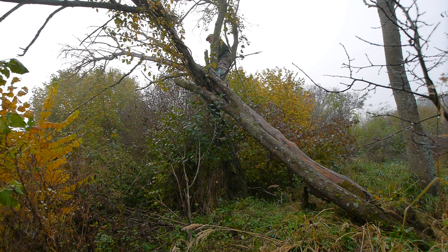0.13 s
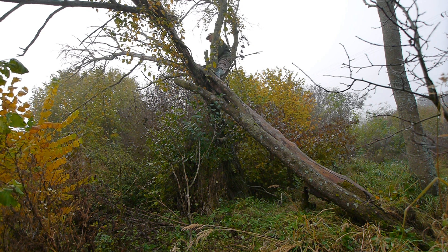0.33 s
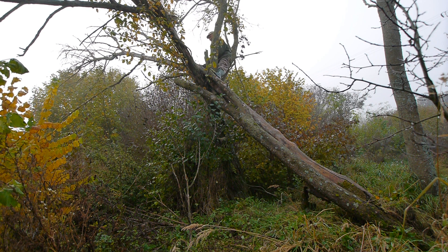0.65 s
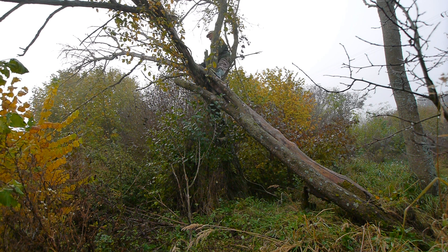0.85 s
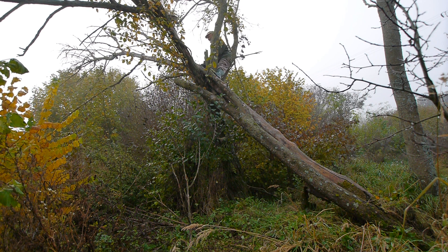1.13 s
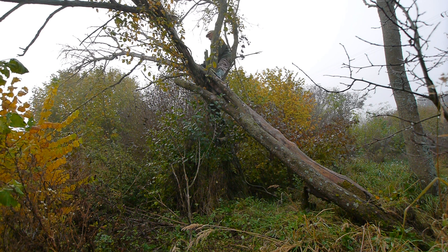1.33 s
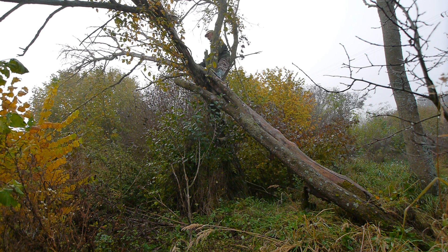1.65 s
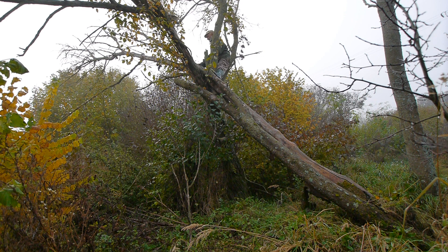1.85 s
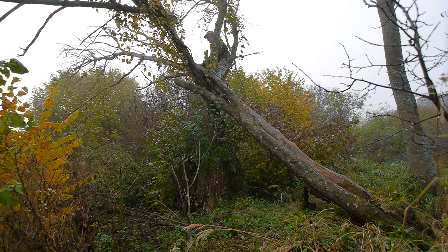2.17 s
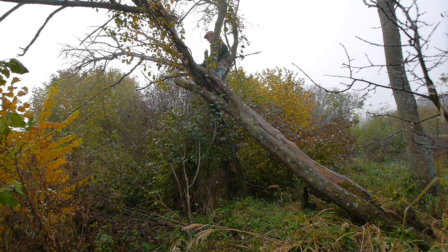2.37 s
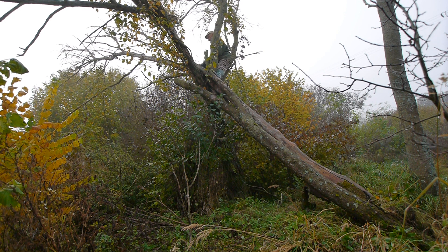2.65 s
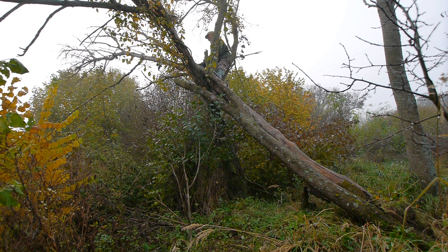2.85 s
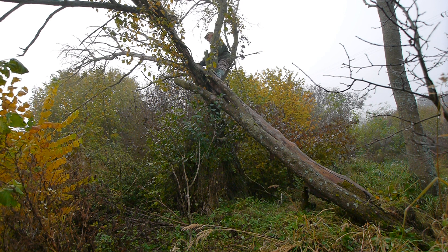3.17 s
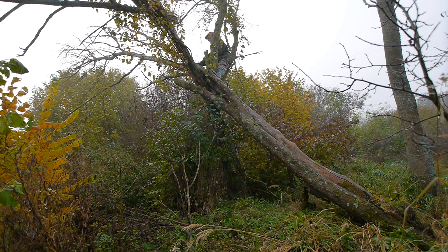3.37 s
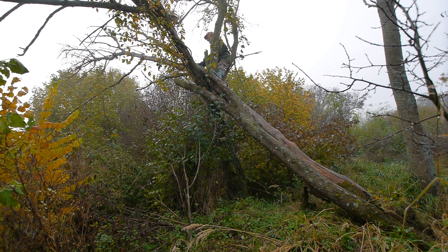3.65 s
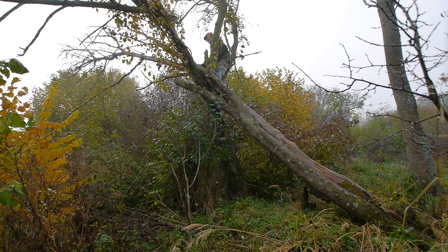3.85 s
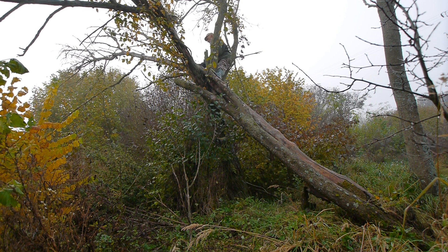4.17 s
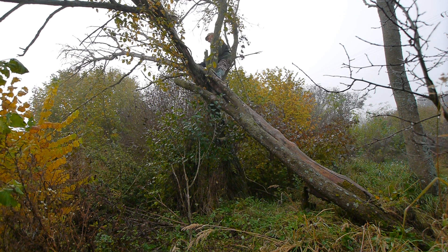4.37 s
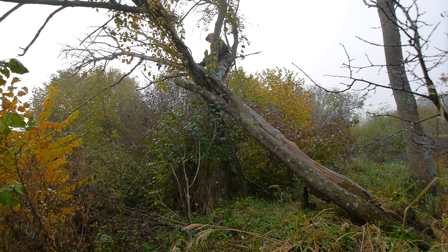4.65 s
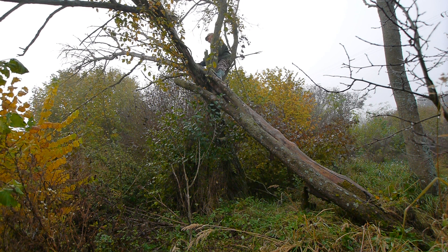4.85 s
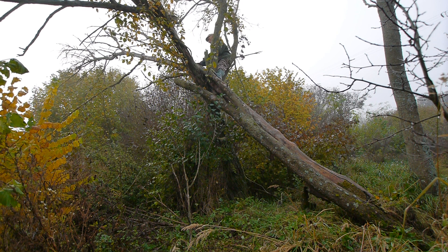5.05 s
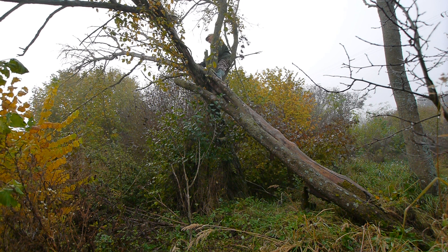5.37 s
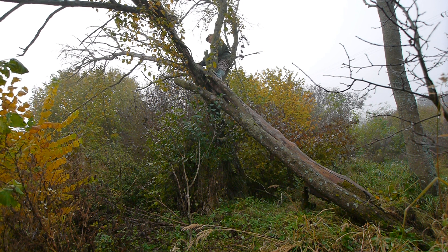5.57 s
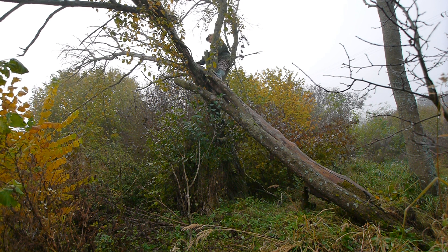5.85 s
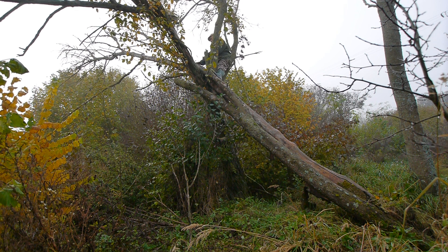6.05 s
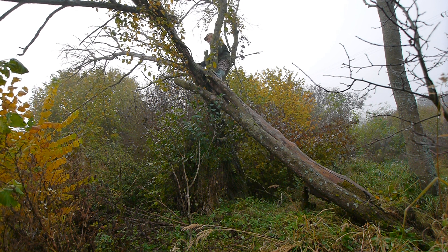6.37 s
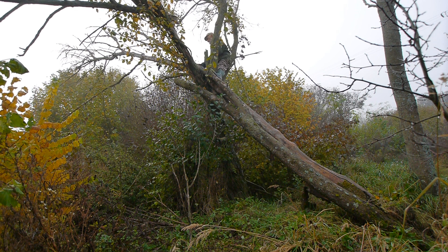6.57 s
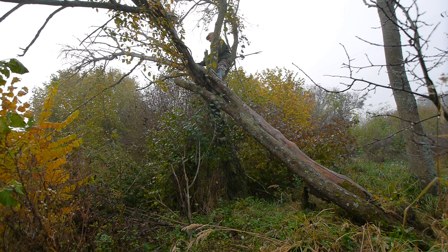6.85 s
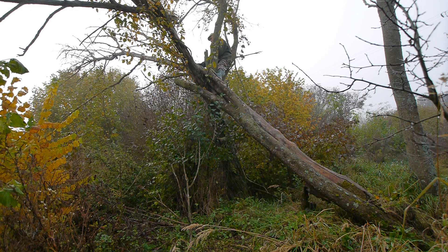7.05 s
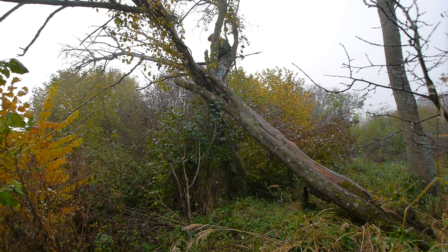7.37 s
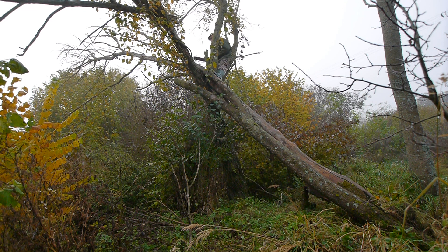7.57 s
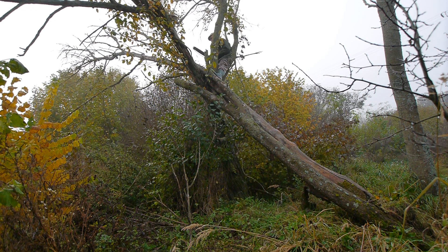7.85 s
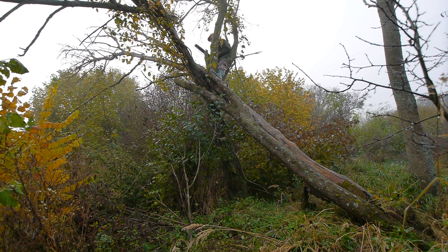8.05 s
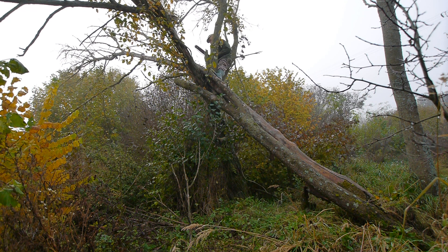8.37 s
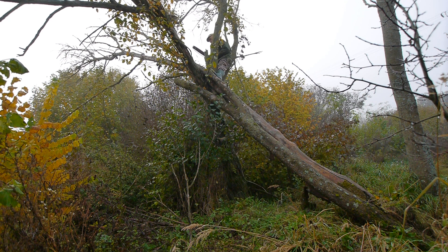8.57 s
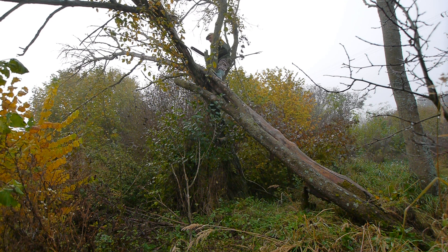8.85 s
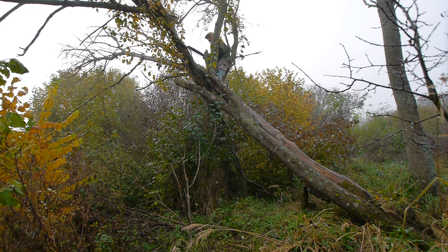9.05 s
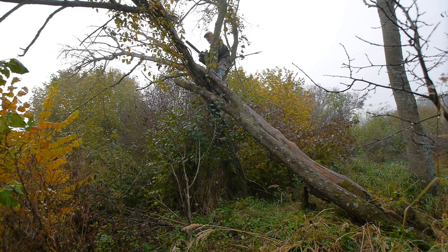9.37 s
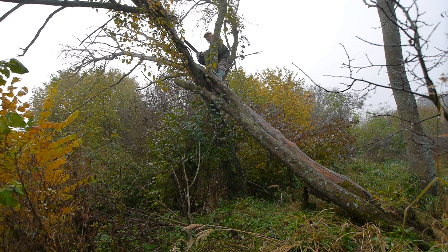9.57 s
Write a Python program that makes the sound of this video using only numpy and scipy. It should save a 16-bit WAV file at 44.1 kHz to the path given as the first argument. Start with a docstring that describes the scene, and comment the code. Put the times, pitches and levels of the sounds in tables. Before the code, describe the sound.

Close electric chainsaw cuts for two seconds, its pitch dipping and rising, then stops abruptly; faint knocks, chain clacks and bird chirps follow outdoors.

```python
"""Chainsaw in a tree

An electric chainsaw cuts a branch close by: it bogs down twice, recovers and runs out. Its chain hums at the link
rate and rattles in the cut, under the whine of the drive. Then the saw is shifted about, with shaped noise for
scrapes, fading bursts for knocks and twigs. Behind are a few gliding bird notes and the far roar of the landscape."""
import sys
import numpy as np
from scipy import signal
from scipy.fft import rfft, irfft, next_fast_len
from scipy.io import wavfile
from scipy.ndimage import uniform_filter1d

SR = 44100
rng = np.random.default_rng(int(sys.argv[2]) if len(sys.argv) > 2 else 0)


def wav_record(signal):
    """Record a signal, one row per channel, as 16-bit PCM in the file named by sys.argv[1]."""
    frames = np.transpose(np.atleast_2d(signal))
    bounded = np.clip(frames, -1, 1)
    # unit amplitude maps onto the largest positive 16-bit level
    quanta = np.round(bounded * 32767).astype(np.int16)
    wavfile.write(sys.argv[1], SR, quanta)


N = 428211  # length in samples
TIME = np.arange(N) / SR  # s
FULL_HZ = 380  # link rate at full speed
RELEASE_S, BRAKE_S = 1.725, 2.12  # the trigger is let go; the brake bites
GRIP_S, LET_GO_S, SNAG_LET_GO_S = 0.014, 0.099, 0.03  # a timed change sets in and lets go; snags free quickly
CONTACT_S = 0.00057  # rise of a knock, clack or snap


def amp(db):
    """Decibels to gain."""
    return 10 ** (np.asarray(db) / 20)


def unit(x):
    """Scales to rms 1."""
    return x / np.sqrt(np.mean(x ** 2) + 1e-20)


def read(points, hz):
    """Reads a table of values on a log-frequency axis."""
    f, value = np.transpose(points)
    return np.interp(np.log(hz + 1), np.log(f + 1), value)


def curves(rows):
    """The columns of a timed table, joined by straight lines sample by sample."""
    s, *columns = np.transpose(rows)
    return [np.interp(TIME, s, c) for c in columns]


def held(rows, let_go_s=LET_GO_S):
    """Each row's value sets in at its start, holds to its end and lets go; overlapping rows add."""
    total = 0
    for start, end, value in rows:
        setting_in = np.clip((TIME - start) / GRIP_S, 0, 1)
        letting_go = np.clip(1 - (TIME - end) / let_go_s, 0, 1)
        total = total + value * setting_in * letting_go
    return total


def after(s):
    """Rises from 0 to 1 just after a time."""
    return np.clip((TIME - s) / LET_GO_S, 0, 1)


def add(mix, s, sound):
    """Mixes a sound in at a time."""
    part = mix[max(round(s * SR), 0):][:len(sound)]
    part += sound[:len(part)]


def wander(hz):
    """Slow chance of rms 1, with hz new random values a second."""
    knots = rng.standard_normal(8192)
    return unit(np.interp(TIME * hz, np.arange(len(knots)), knots))


def swell(length):
    """A smooth hump of height 1 that stays above half for about length seconds."""
    return np.hanning(int(2 * np.clip(length, .005, .5) * SR))


def colour(x, spectrum, modes=()):
    """A causal filter of unit energy: a spectrum with steep skirts and resonances on top."""
    size = 4096
    hz = np.fft.rfftfreq(size, 1 / SR)
    lowest_hz, highest_hz = spectrum[0][0], spectrum[-1][0]
    octaves_outside = np.abs(np.log2((hz + 1) / np.clip(hz + 1, lowest_hz, highest_hz)))
    peaks_db = sum(g / (1 + (2 * (hz - f) / w) ** 2) for f, w, g in modes)
    db = read(spectrum, hz) - 40 * octaves_outside + peaks_db
    # folding the cepstrum makes the filter respond as early as it can (minimum phase)
    cepstrum = irfft(np.log(amp(np.maximum(db, -90))))
    cepstrum[1:size // 2] *= 2
    cepstrum[size // 2 + 1:] = 0
    taps = irfft(np.exp(rfft(cepstrum)))
    return signal.oaconvolve(x, taps[None] / np.linalg.norm(taps), axes=1)[:, :N]


def pair(likeness):
    """Left and right white noise, alike to a degree that depends on frequency."""
    size = next_fast_len(N)
    same = np.clip(read(likeness, np.fft.rfftfreq(size, 1 / SR)), -1, 1)
    mid, side = rfft(rng.standard_normal((2, size))) * np.sqrt([(1 + same) / 2, (1 - same) / 2])
    return irfft(np.array([mid + side, mid - side]), size)[:, :N]


def rings(rows):
    """Narrow tones that swell up and die away, wavering in phase."""
    out = np.zeros(N)
    for s, length, hz, width, db in rows:
        hump = swell(length)
        drift = np.cumsum(rng.standard_normal(SR)[:len(hump)]) * np.sqrt(2 * np.pi * abs(width) / SR)
        phase = 2 * np.pi * hz * TIME[:len(hump)] + uniform_filter1d(drift, size=200)
        add(out, s - length, amp(db) * hump * np.sin(phase))
    return out


# Speed of the chain. Each row: time in seconds, links passing per second in Hz (before a slight flutter).
CHAIN_SPEED = [(0.05, 380.5), (0.2, 365), (0.25, 345), (0.3, 297), (0.34, 262), (0.47, 208), (0.55, 269),
               (0.6, 296), (0.68, 319), (0.8, 336), (0.92, 279.8), (1.06, 259), (1.2, 323), (1.28, 340),
               (1.46, 365), (1.72, 386), (1.8, 327), (1.92, 261), (2.0, 225), (2.12, 176), (2.2, 120),
               (2.26, 80)]
# Short narrow tones in the noise of the saw. Each row: loudest moment in seconds, length in seconds,
# pitch in Hz, width in Hz, level in dB.
SHORT_TONES = [(0.275, 0.02, 510, 20, -21), (0.3, 0.04, 700, 15, -19), (0.98, 0.12, 825, 26, -21.5),
               (1.6, 0.25, 865, 44, -27.5), (1.79, 0.094, 1670, 20, -28.5), (2.18, 0.06, 871, 93, -25.5),
               (2.235, 0.046, 462.4, 19, -27), (1.5, 0.12, 11000, 60, -37)]


def saw(flutter=.003, flutter_hz=70, stop_s=2.204, stop_t60=0.24):
    """The speed of the chain drives hum, whine and cutting, which fade fast as the brake stops it."""
    link_hz, = curves(CHAIN_SPEED)
    turns = np.cumsum(link_hz * (1 + flutter * wander(flutter_hz))) / SR  # links passed so far
    running = amp(-60 * np.clip((TIME - stop_s) / stop_t60, 0, 3))
    drive = chain_hum(turns, link_hz) + drive_whine(turns, link_hz)
    tones = running * drive + rings(SHORT_TONES)
    return cutters(turns, link_hz, running) + np.sqrt(2) * tones


# Upper harmonics of the link rate. Each entry: relative level in dB, for the fourth to the eighth.
UPPER_HARMONICS = [-6.5, -4.5, -10, -4.5, -11]
# How loudly the saw radiates a link harmonic. Each row: frequency in Hz, relative level in dB.
HUM_RESONANCES = [(80, -71), (110, -58.5), (165, -43), (205, -44), (235, -26.5), (268, -32), (295, -22.5),
                  (335, -27.5), (358, -36.5), (378, -29.5), (500, -28.5), (580, -31.5), (660, -25),
                  (760, -31.5), (870, -29.5), (1080, -29), (1200, -37.5), (1290, -44), (1385, -30),
                  (1480, -43), (1660, -32.5), (1800, -40), (1990, -32.5), (2200, -35), (2500, -34),
                  (3000, -46.5)]
# The even harmonics stand out when the cutters bite cleanly and when the brake pulls the chain taut.
# Each row: start in seconds, end in seconds, lift in dB (the upper harmonics take a share of it).
CLEAN_CUTS = [(0.48, 0.8, 9), (1.08, 1.5, 8), (2.17, 2.2, 4.5)]
# The chain snags and hammers in the kerf, which breaks up its hum.
# Each row: start in seconds, end in seconds, relative level of the knocking in dB.
SNAGS = [(0.0, 0.22, -22), (0.04, 0.054, -21), (0.232, 0.32, -15), (0.334, 0.378, -15), (0.39, 0.46, -21),
         (0.82, 1.022, -25.5), (1.045, 1.074, -15.5)]


def chain_hum(turns, link_hz, throb=0.14, throb_hz=130, first_db=1, second_db=0, third_db=0.0, snag_db=-9,
              upper_share=0.74, release_dip_s=0.02, release_dip_db=-7, brake_db=3):
    """Each link that passes the sprocket gives a push; the harmonics sweep through the resonances of the saw."""
    lift_db = held(CLEAN_CUTS)
    harmonics = [(1, first_db), (2, second_db + lift_db), (3, third_db)]
    for k, db in enumerate(UPPER_HARMONICS, 4):
        harmonics.append((k, db + upper_share * lift_db * (k % 2 == 0)))
    hum = 0
    for k, db in harmonics:
        level = amp(db + read(HUM_RESONANCES, k * link_hz)) * (1 + throb * wander(throb_hz))
        hum = hum + level * np.sin(2 * np.pi * k * turns)
    snagged = np.minimum(held([(start, end, 1) for start, end, _ in SNAGS], SNAG_LET_GO_S), 1)
    # the hum dips as the drive lets go; later the braked links push harder
    dip_db = held([(RELEASE_S, RELEASE_S + release_dip_s, release_dip_db)], SNAG_LET_GO_S)
    return amp(snag_db * snagged + dip_db + brake_db * after(BRAKE_S)) * hum


# Gear and fan tones. Each row: multiple of the link rate, relative level at full speed in dB,
# rise in dB per octave of speed.
WHINE = [(7.55, 0, 22), (15.1, -10, 3), (16.8, -1, 36)]
# Each tone is louder for a while near the start. One list for each tone above.
# Each row: start in seconds, end in seconds, lift in dB.
WHINE_LIFTS = [
    [(-0.02, 0.25, 7.5), (0.28, 0.32, 11)],
    [(0.21, 0.28, 13)],
    [(-0.02, 0.18, 9)],
]


def drive_whine(turns, link_hz, full_db=-34.5, blur=.006, waver=0.3, coast_db=-13):
    """Gears and fan grow louder with speed, each at its own rate; play in the gears blurs their tones."""
    shaft = turns + np.cumsum(link_hz * blur * wander(350)) / SR
    level_db = full_db + coast_db * after(RELEASE_S)  # quieter once the trigger is let go
    octaves = np.log2(link_hz / FULL_HZ)
    whine = 0
    for (k, db, slope), lifts in zip(WHINE, WHINE_LIFTS):
        level = amp(level_db + db + slope * octaves + held(lifts)) * (1 + waver * wander(120))
        whine = whine + level * np.sin(2 * np.pi * k * shaft)
    return whine


# Strength of the cutting noise. Each row: time in seconds, relative level in dB.
CUTTING = [(0.0, -22.5), (0.59, -19.5), (0.61, -18.5), (0.9, -21.5), (1.07, -17), (1.11, -22), (1.19, -20),
           (1.71, -19), (1.92, -22.5), (2.11, -24), (2.22, -19)]
# What the knocking chain excites in the housing. Each row: frequency in Hz, relative level in dB per Hz.
HOUSING = [(35, -85), (60, -40.5), (96, -38), (145, -12), (189, -10.5), (230, 2), (304, 4.5), (365, 0.5),
           (501, 5.5), (571, -1.5), (705, -1), (780, -3.5), (880, -2.5), (968, -17), (1400, -26),
           (1820, -30.5), (3080, -120)]


def cutters(turns, link_hz, running, bite_db=1.0, bite_decay=1.0, chatter_db=0.52, bounce_db=1.1, bounce_hz=60,
            knock_db=-35.0, slack_db_per_octave=9, rasp_db=-24.0, rasp_share=0.54, sizzle_db=-0.4, blow_db=-2.5,
            rattle_db=-4.0, coast_knock_db=-4):
    """Bites of uneven size drive rasp and sizzle with the cutting; a slow or snagged chain knocks."""
    cutting_db, = curves(CUTTING)
    effort_db = cutting_db - np.mean(CUTTING, axis=0)[1]
    sizes = amp(bite_db * np.clip(rng.standard_normal(8192), -2, 2))[turns.astype(int) % 8192]
    bites = unit(sizes * np.exp(-(turns % 1) / bite_decay))
    # the bar bounces in the kerf, and the chain never quite leaves its groove
    sliding = unit(1 + 1.8 * bites) * unit(amp(chatter_db * wander(55.86))) * running
    bounce = unit(amp(bounce_db * np.clip(wander(bounce_hz), -2, 2)))
    hammering = unit(1 + 2.8 * bites) * bounce * running
    slack_db = knock_db + effort_db + slack_db_per_octave * np.log2(FULL_HZ / link_hz)
    slack = amp(slack_db + coast_knock_db * after(RELEASE_S))
    snagging = held([(start, end, amp(db)) for start, end, db in SNAGS], SNAG_LET_GO_S)
    knock = np.hypot(slack, snagging)
    thumps = colour((amp(blow_db) * knock * running * blows(turns))[None], HOUSING)
    rattle = amp(rattle_db) * knock * hammering
    rasp = amp(rasp_db + rasp_share * effort_db) * sliding
    sizzle = amp(sizzle_db + cutting_db) * sliding
    return thumps + body(rattle, rasp, sizzle, HOUSING)


def blows(turns, stray=.09, spread_db=4):
    """Every second link carries a cutter, which strikes the wood a little early or late, with its own force."""
    strikes = np.diff(np.floor(turns / 2 + stray * wander(150)), prepend=0) > 0
    force = strikes * amp(spread_db * np.clip(rng.standard_normal(N), -2, 1.5))
    return force / np.sqrt(np.mean(force[TIME < BRAKE_S] ** 2))


# Middle and high noise of wood, bar and chain. Each row: frequency in Hz, relative level in dB per Hz.
RASP = [(650, -2), (1100, -3), (1240, -6.5), (1380, -5), (1560, -7), (1700, -5.5), (1850, -6.5),
        (2030, -4.5), (2580, -6.5), (2810, -5.5), (4040, -6.5), (4470, -12), (5100, -4), (7000, -13.5),
        (9100, -20.5), (15400, -120)]
SIZZLE = [(3530, -33.5), (6000, -5), (6700, -3), (8930, 4.5), (10700, 2), (13100, -7.5), (15200, -14.5),
          (16000, -27.5)]
# Resonances of the guide bar. Each row: frequency in Hz, width in Hz, lift in dB.
BAR = [(1664, 60, 3.5), (2066, 70, 2), (2680, 80, 0.5), (3340, 140, 3), (4150, 180, 3), (4990, 140, 2),
       (8790, 400, -2.5)]
# Likeness of left and right for near sounds. Each row: frequency in Hz, correlation (1 is the same).
NEAR_SAME = [(700, 1), (1400, 0.99), (3000, 0.93), (8000, 0.95), (14000, 0.24)]


def body(low, middle, high, hollow):
    """Three force envelopes excite a hollow part, the wood and bar, and the steel of the chain."""
    noise = pair(NEAR_SAME)
    return colour(noise * low, hollow) + colour(noise * middle, RASP, BAR) + colour(noise * high, SIZZLE, BAR)


# Saw and clothing rub on bark. Each row: loudest moment in seconds, length in seconds, relative level in dB,
# brightness in dB.
RUBS = [(2.859, 0.046, -51.5, -1.5), (3.105, 0.036, -58, -7), (3.264, 0.093, -53, -3.5),
        (3.387, 0.026, -58, -6.5), (3.807, 0.027, -65, -5.5), (3.92, 0.13, -61.5, -5.5),
        (4.795, 0.089, -56.5, 0), (5.597, 0.075, -67, -12.5), (5.767, 0.028, -56.5, 1),
        (7.161, 0.033, -41, 2), (7.211, 0.065, -42, -0.5), (7.258, 0.038, -36, -3.5),
        (7.312, 0.068, -39, 1), (7.391, 0.044, -46, 9), (7.443, 0.1, -57, 2), (8.362, 0.1, -60.5, 1),
        (8.74, 0.33, -62.5, 2), (9.059, 0.025, -58.5, -4.5), (9.505, 0.03, -56.5, -2.5)]
# The saw knocks against the tree. Each row: start in seconds, relative level in dB, brightness in dB.
KNOCKS = [(2.247, -18.5, 1), (2.291, -32, 5), (2.552, -54, -0.5), (2.649, -53.5, -2), (3.185, -53.5, 0.5),
          (3.254, -51, -8), (3.275, -58, -13), (3.735, -58, -6), (3.81, -61, -8), (3.93, -57, -12),
          (3.952, -69, -6), (4.021, -62.5, -16), (5.595, -58, -8), (5.738, -61, -14), (7.149, -45, -6),
          (7.676, -58.5, -15), (9.62, -52, -9), (4.359, -47.5, -2.5), (4.798, -53, -11),
          (5.282, -42.5, -2.5), (5.31, -54, -4), (6.838, -48.5, -9), (7.593, -64, -12), (9.272, -46.5, -3)]
# The slack chain clacks on the bar. Each row: start in seconds, relative level in dB.
CLACKS = [(2.845, -43), (7.149, -25.5), (7.219, -32), (7.261, -28), (7.307, -37), (7.32, -36),
          (7.375, -30.5), (7.395, -37)]
# Hollow knocks that ring. Each row: start in seconds, pitch in Hz, time to fade by 60 dB in seconds,
# relative level in dB.
HOLLOWS = [(0.469, 339, 0.079, -5), (3.276, 334, 0.036, -27), (4.801, 800, 0.039, -35.5),
           (5.283, 640, 0.033, -26.5), (5.31, 790, 0.069, -36), (5.844, 837, 0.04, -42.5),
           (7.237, 623, 0.051, -28), (7.2605, 479, 0.045, -19), (7.594, 1380, 0.0092, -31)]
# The dull thud of the trunk under blows. Each row: frequency in Hz, relative level in dB per Hz.
TRUNK = [(70, -25), (150, -21), (205, 2.5), (320, 1.5), (480, -3), (650, -7.5), (830, -4), (1050, -13),
         (1600, -14)]
# What each kind of contact excites: thud in dB, scrape in dB, hiss in dB.
RUB_MIX, KNOCK_MIX, CLACK_MIX = (0, -7, 0), (1, -2.2, 0.92), (-7.5, -28, 0)
KNOCK_T60, CLACK_T60 = 0.055, 0.029  # s to fade by 60 dB
# faint brushes while the saw is shifted about
BRUSHES_PER_S, BRUSH_S, BRUSH_DB, BRUSH_SPREAD_DB, BRUSH_BRIGHT_DB = 3.4, 0.019, -64.5, 1, -4.5


def handling(grain_db=2.3, grain_hz=400, hollow_rise_s=0.00081):
    """Grainy rubs and sharp knocks and clacks play the same body; a few knocks ring hollow."""
    force, hollow, t = np.zeros((3, N)), np.zeros(N), np.arange(SR // 4) / SR

    def touch(s, shape, mix, db, bright_db=0):
        """One contact; brightness trades thud for hiss."""
        for band, share_db, tilt_db in zip(force, mix, (-bright_db, 0, bright_db)):
            add(band, s, amp(db + share_db + tilt_db) * shape)

    for s, length, db, bright_db in RUBS:
        touch(s - length, swell(length), RUB_MIX, db, bright_db)
    for when, size in rng.random((int(BRUSHES_PER_S * N / SR), 2)):
        brush_db = BRUSH_DB + BRUSH_SPREAD_DB * (2 * size - 1)
        touch(when * N / SR, swell(BRUSH_S), RUB_MIX, brush_db, BRUSH_BRIGHT_DB)
    # ridges of bark catch and let go, partly together in all three bands
    catches = wander(grain_hz)
    force *= [unit(amp(grain_db * np.clip(catches + wander(grain_hz), -2.5, 2.5))) for _ in force]
    for rows, mix, t60 in (KNOCKS, KNOCK_MIX, KNOCK_T60), (CLACKS, CLACK_MIX, CLACK_T60):
        for s, *strength in rows:
            touch(s, np.minimum(t / CONTACT_S, 1) * amp(-60 * t / t60), mix, *strength)
    for s, hz, t60, db in HOLLOWS:
        swing = amp(db - 60 * t / t60) * np.sin(2 * np.pi * hz * t) * (1 - np.exp(-t / hollow_rise_s))
        thin = signal.butter(2, hz / 2, "highpass", fs=SR, output="sos")
        add(hollow, s, signal.sosfilt(thin, swing))
    return body(*force, TRUNK) + hollow


# Twigs and bark snap; the first row is a brief ring of the guide bar. Each row: start in seconds, frequency in
# Hz, width in Hz, relative level in dB.
TWIGS = [(3.218, 4900, 1500, -51), (3.231, 1700, 1200, -44), (3.246, 1750, 1200, -43),
         (3.254, 1690, 1300, -43), (5.421, 4900, 900, -45), (5.761, 5530, 700, -47.5),
         (6.586, 1500, 800, -52), (6.691, 4500, 2500, -46), (8.21, 5400, 700, -48),
         (8.221, 4300, 2200, -45), (8.332, 6300, 3000, -46), (8.76, 3000, 1000, -47),
         (8.87, 2700, 1500, -41), (9.053, 3000, 2000, -52)]


def twigs(t60=0.033):
    """Each snap or ring is a short burst of noise that rings in its own band."""
    out, t = np.zeros(N), np.arange(SR // 10) / SR
    for s, hz, width_hz, db in TWIGS:
        band = signal.iirpeak(hz, hz / abs(width_hz), fs=SR)
        crack = unit(signal.lfilter(*band, rng.standard_normal(len(t))))
        add(out, s, np.minimum(t / CONTACT_S, 1) * amp(db - 60 * t / t60) * crack)
    return out


# Small birds. Each row: start in seconds, length in seconds, first pitch in Hz, last pitch in Hz,
# relative level in dB.
CHIRPS = [(3.712, 0.045, 7430, 6830, -67), (5.618, 0.024, 7150, 6800, -59), (6.34, 0.063, 5680, 4830, -60),
          (9.66, 0.032, 6000, 4700, -57)]


def birds(trill=.03):
    """Thin gliding sine notes with a fast, irregular quaver in pitch."""
    out, quaver = np.zeros(N), wander(510)
    for s, length, first_hz, last_hz, db in CHIRPS:
        n = int(max(length, .01) * SR)
        hz = np.linspace(first_hz, last_hz, n) * (1 + trill * quaver[int(s * SR) - n:][:n])
        note = np.sin(2 * np.pi * np.cumsum(hz) / SR)
        add(out, s, amp(db) * np.sqrt(2) * signal.windows.tukey(n, .5) * note)
    return np.array([out, out])


# How long echoes last. Each row: frequency in Hz, time to fade by 60 dB in seconds.
ECHO_FADE = [(250, 0.14), (600, 0.31), (850, 0.42), (1300, 0.46), (2000, 0.4), (4500, 0.37), (9000, 0.35),
             (15000, 0.087)]
# Likeness of left and right for echoes. Each row: frequency in Hz, correlation (1 is the same).
TAIL_SAME = [(500, 1), (900, 0.94), (1800, 0.28), (5000, 0.2)]


def woods(x):
    """Trunks and branches scatter the sound into a short tail of random echoes, longest in the middle range."""
    taps = rng.standard_normal((2, SR // 2)) * (rng.random(SR // 2) < 3000 / SR)  # about 3000 echoes a second
    taps[:, :int(.004 * SR)] = 0  # no echo in the first 4 ms
    hz, t, z = signal.stft(taps, SR, nperseg=256)
    same = np.clip(read(TAIL_SAME, hz), 0, 1)[:, None]
    z = np.array([z[0], same * z[0] + np.sqrt(1 - same ** 2) * z[1]])
    fade = amp(-60 * t / read(ECHO_FADE, hz)[:, None])
    tail = signal.istft(z * fade, SR, nperseg=256)[1]
    return signal.fftconvolve(x, tail / np.linalg.norm(tail[0]), axes=1)[:, :N]


# Far roar and rustle of leaves. Each row: time in seconds, relative roar level in dB,
# relative leaf hiss level in dB.
AIR = [(2.45, -57, -63), (3.0, -58, -63.5), (4.0, -56.5, -62), (5.0, -53.5, -60), (7.9, -52.5, -58),
       (8.8, -54.5, -58), (9.7, -52, -59)]
# Colour of the roar, then of the leaves. Each row: frequency in Hz, relative level in dB per Hz.
ROAR = [(12, -36), (20, -12), (80, 1.5), (177, -4), (228, -3.5), (287, 3), (346, -1), (401, 2.5), (464, 0),
        (691, -5.5), (1890, -9.5), (3000, -33.5), (3900, -45.5), (6600, -120)]
LEAVES = [(1180, -29), (2000, 2.5), (3610, -2), (4510, -0.5), (5050, 0.5), (5690, -1.5), (8730, -1),
          (13600, -5.5), (14600, -23), (15000, -47), (15500, -39.5)]
# Faint moans in the roar. Each row: loudest moment in seconds, length in seconds, pitch in Hz, width in Hz,
# level in dB.
MOANS = [(2.66, 0.17, 390, 18, -59.5), (3.61, 0.12, 475, 7.6, -51), (3.8, 0.1, 405, 20, -56),
         (4.92, 0.2, 385, 15, -52), (6.35, 0.3, 375.4, 29, -54), (6.7, 0.5, 116, 4.8, -61),
         (9.11, 0.11, 345, 30, -53.5), (9.62, 0.3, 1130, 580, -63), (9.62, 0.2, 520, 200, -55.5)]
# Likeness of left and right for far sounds. Each row: frequency in Hz, correlation (1 same, -1 opposite).
FAR_SAME = [(60, 0.91), (250, 0.97), (640, 0.74), (1400, -0.68), (3000, -0.43), (7000, 0.13)]


def air(roar_db=1, leaves_db=0, ticks_per_s=22, tick_db=4):
    """Wavering noise makes a far roar and the hiss of leaves; random fading bursts make the leaves tick."""
    roar, leaves = amp(curves(AIR))
    noise = pair(FAR_SAME)
    ticks = (rng.random(N) < ticks_per_s / SR) * np.minimum(rng.exponential(0.27, N), 1)
    ticks = signal.lfilter([amp(tick_db)], [1, -np.exp(-1 / (0.0057 * SR))], ticks)  # time constant 5.7 ms
    far = colour(noise * roar * amp(roar_db + 0.98 * wander(6.6)), ROAR)
    near = colour(noise * leaves * (amp(leaves_db + 1.1 * wander(16.0)) + ticks), LEAVES)
    return far + near + np.sqrt(2) * rings(MOANS)


# Balance of the near sounds. Each row: frequency in Hz, left minus right in dB.
SAW_BALANCE = [(700, 0), (2400, 0.6), (4400, 1.2), (15000, 1.0)]


def scene(wet_db=-11, bird_wet_db=1, bird_dry_db=-9):
    """The saw and its handling are near; the birds are deep among the trees, with more echo than direct sound."""
    size = next_fast_len(N)
    lean_db = read(SAW_BALANCE, np.fft.rfftfreq(size, 1 / SR)) / 2
    centred = saw() + handling() + twigs()
    near = irfft(rfft(centred, size) * amp([lean_db, -lean_db]), size)[:, :N]
    song = birds()
    echoes = woods(amp(wet_db) * near + amp(bird_wet_db) * song)
    return near + amp(bird_dry_db) * song + echoes + air()


def record(dry, edge_hz=15900):
    """The loudest peaks are rounded off; then a steep low-pass filter removes the top treble."""
    rounded = dry / (1 + np.abs(dry / .88) ** 6) ** (1 / 6)
    low_pass = signal.firwin(511, edge_hz, window=("kaiser", 9), fs=SR)
    return signal.oaconvolve(rounded, low_pass[None], "same")


dry = scene()
out = record(dry)
wav_record(out)
```